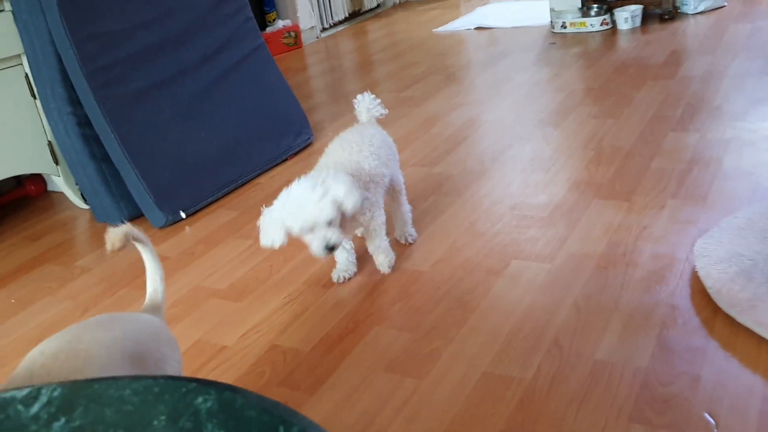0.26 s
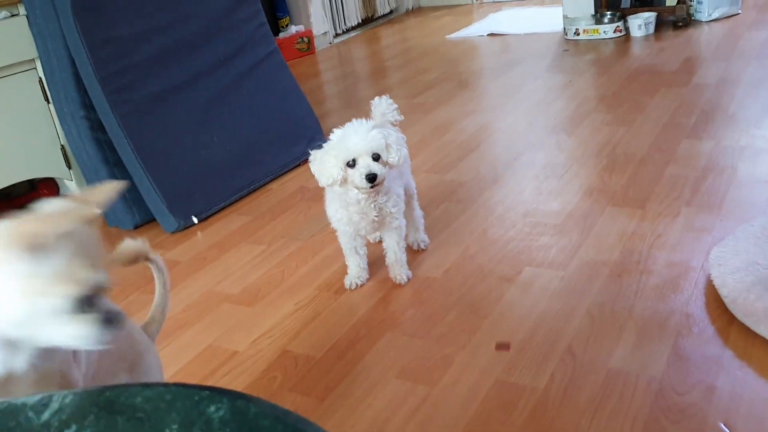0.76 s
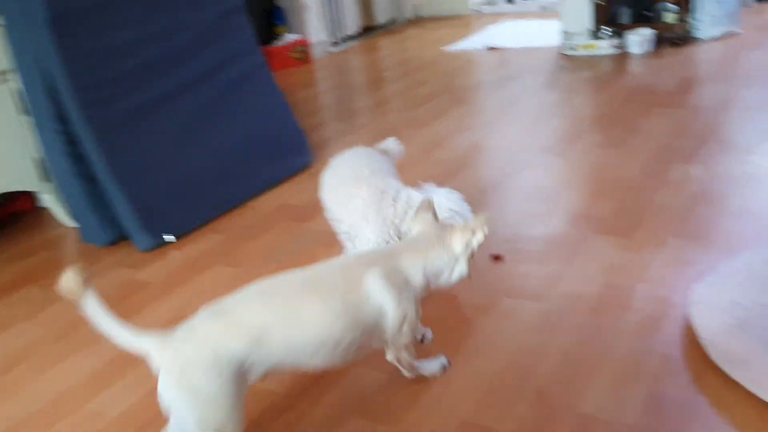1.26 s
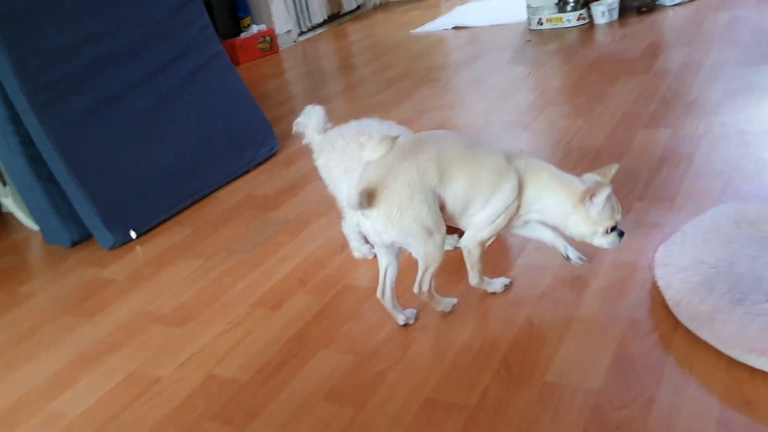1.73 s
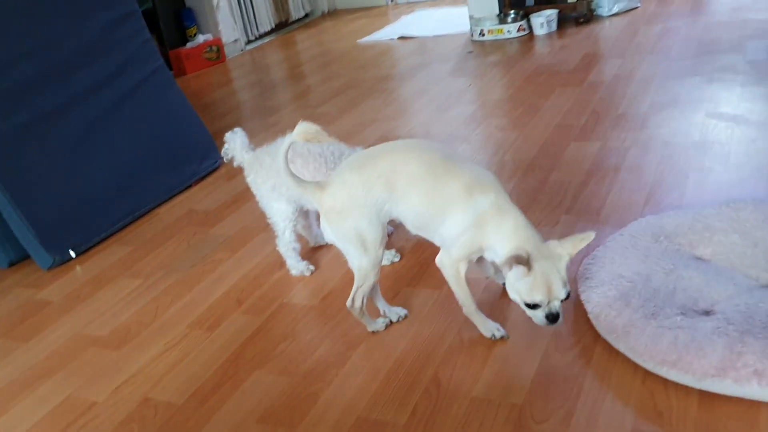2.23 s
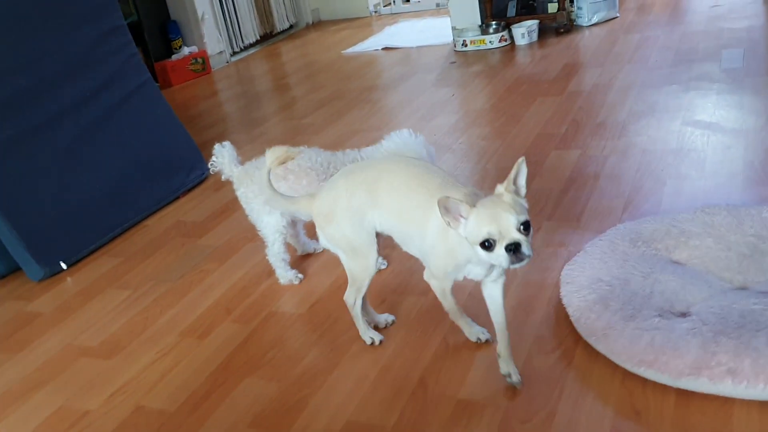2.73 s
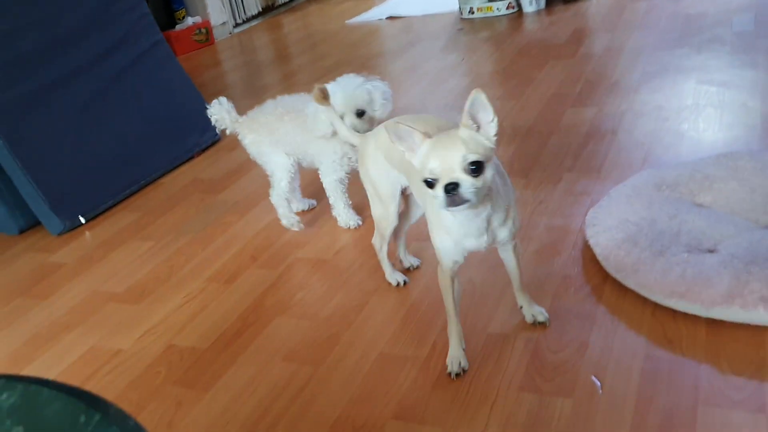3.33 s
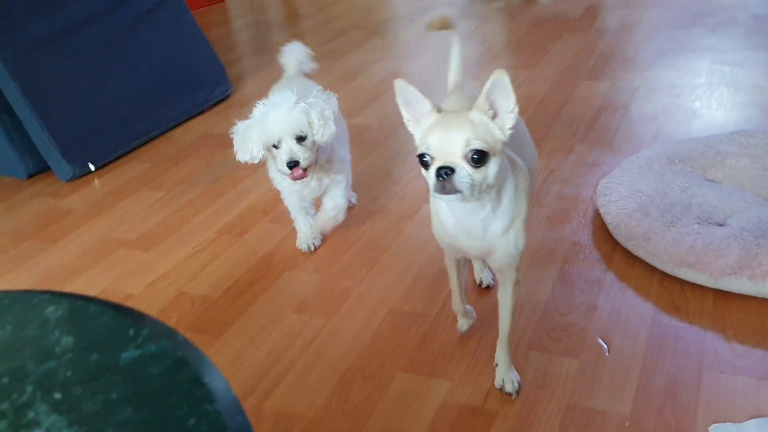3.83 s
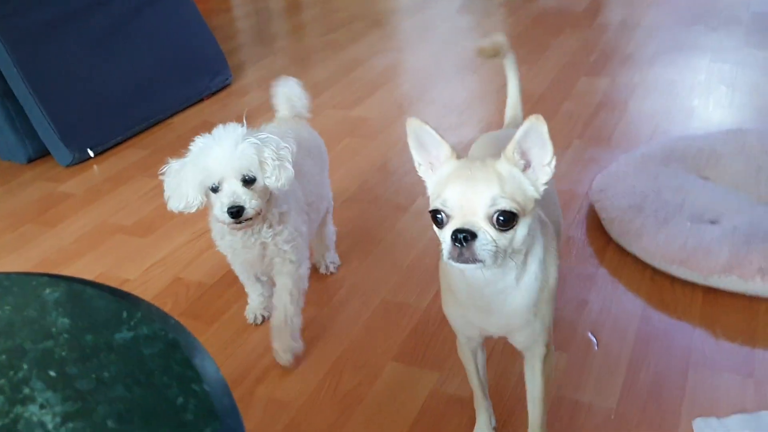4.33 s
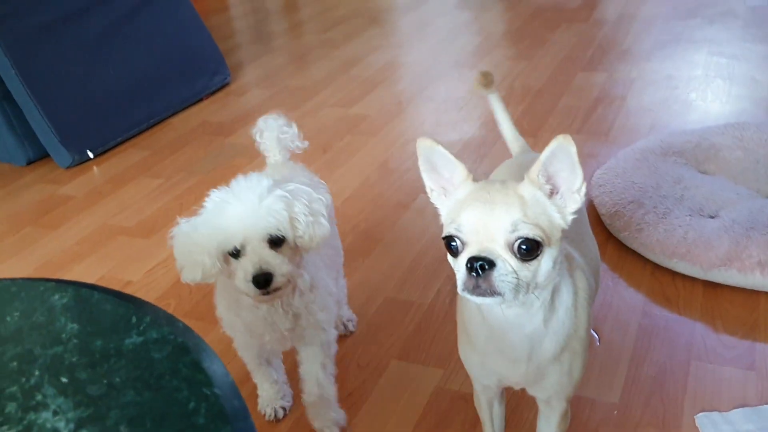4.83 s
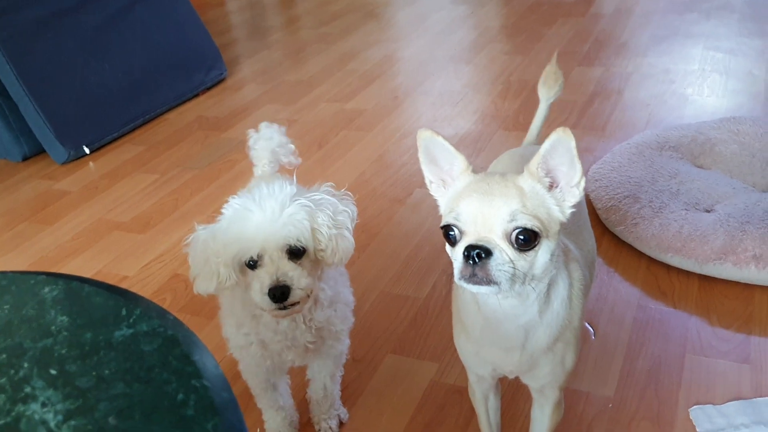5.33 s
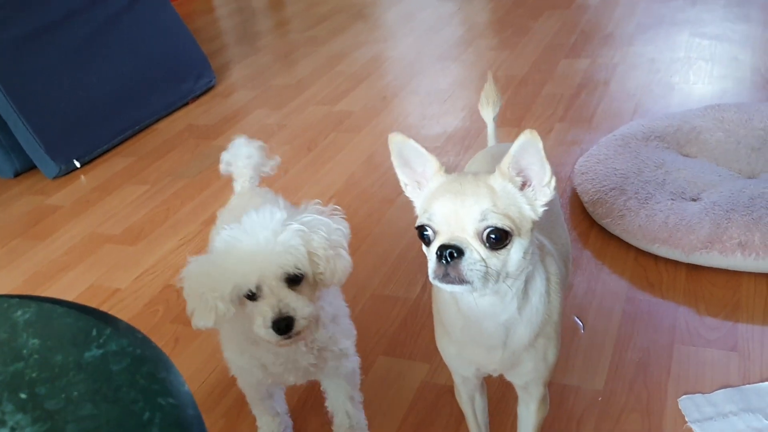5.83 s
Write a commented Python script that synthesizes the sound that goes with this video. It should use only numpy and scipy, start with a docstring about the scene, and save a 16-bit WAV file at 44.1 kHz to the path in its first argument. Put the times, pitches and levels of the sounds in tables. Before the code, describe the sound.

Small dogs' claws skitter across a hard living-room floor after a dropped treat, followed by brief crackly chewing of kibble, close by.

```python
"""Small dogs on a laminate floor in a living room, near a phone with two microphone ports.
A low rumble and faint hiss (shaped noise) run throughout; paw scuffs (tiny clicks) and faint sniffs come and go.
Bumps come early on; claws tick on the floor in front, and a treat lands: short rings, clicks and knocks that
ring on in the bare room. Later, close on the left, dry food is crunched: louder snaps over a dense crackle."""
import sys
import numpy as np
from scipy import signal
from scipy.fft import rfft, irfft, next_fast_len
from scipy.io import wavfile
from scipy.ndimage import uniform_filter1d

SR = 44100
rng = np.random.default_rng(int(sys.argv[2]) if len(sys.argv) > 2 else 0)


def output_pcm(signal):
    """Save a mono or channel-first signal as 16-bit PCM at the path in sys.argv[1].

    Samples are clipped to [-1, 1] before scaling.
    """
    pcm = np.clip(np.atleast_2d(signal).T, -1, 1) * 32767
    wavfile.write(sys.argv[1], SR, np.round(pcm).astype(np.int16))


N = 267687  # length in samples
SIZE = next_fast_len(N)  # a length that transforms quickly

# how alike left and right are at each pitch: pitch_hz [Hz], likeness [-1 to 1]
LIKENESS = [(60, 0.95), (180, 0.95), (550, 0.55), (1650, -0.3), (4970, 0.071), (15000, 0.076)]
# colour of a dry click: pitch_hz [Hz], relative_db [dB]
CLICK_COLOUR = [(900, -18.5), (1500, -2), (2500, 1.5), (3800, -1), (5000, -3.5), (6500, -24), (9000, -43.5)]
# colour of the fine treble in a click: pitch_hz [Hz], relative_db [dB]
TREBLE_COLOUR = [(3500, -33), (5500, 0.5), (7000, 2.5), (10000, -1.5), (13000, -6.5), (15000, -14.5),
                 (17000, -24)]


def gain_of(db):
    """Turns decibels into a plain multiplier."""
    return 10 ** (np.asarray(db) / 20)


def evened(x):
    """Scales a sound to an average strength (rms) of 1."""
    return x / np.sqrt(np.mean(x ** 2) + 1e-20)


def add(mix, at, sound):
    """Mixes a sound in from sample number at."""
    mix[..., at:at + sound.shape[-1]] += sound


def read(points, hz):
    """Reads a table between its points, with pitch on a log scale."""
    point_hz, value = np.transpose(points)
    return np.interp(np.log(hz + 1), np.log(point_hz + 1), value, value[0], value[-1])


def colour(x, points):
    """Filters with the given dB spectrum, never answering early; the filter's energy is 1."""
    log_gain = read(points, abs(np.fft.fftfreq(4096, 1 / SR))) * np.log(10) / 20
    # the Hilbert transform gives the phase that makes the filter answer at once
    taps = np.fft.ifft(np.exp(np.conj(signal.hilbert(log_gain)))).real[:2048]
    return signal.oaconvolve(x, taps / np.linalg.norm(taps))[:N]


def resonate(x, hz, width_hz):
    """Keeps a band around the curve hz: shifts it down to zero, smooths, and shifts back."""
    turn = np.exp(2j * np.pi * np.cumsum(hz) / SR)
    memory = np.exp(-np.pi * width_hz / SR)
    smooth = signal.lfilter([1 - memory], [1, -memory], x / turn)
    return 2 * (turn * smooth).real


def swells(rows):
    """Sums swells (peak_s, level_db, rise_s, fall_s), each straight in dB on both sides."""
    swell_db = 20  # change over one rise or fall time
    t = np.arange(0, N + 64, 64) / SR  # every 64th sample is enough
    gain = np.zeros(len(t))
    for peak_s, db, rise_s, fall_s in rows:
        distance = np.maximum((peak_s - t) / abs(rise_s), (t - peak_s) / abs(fall_s))
        gain += gain_of(db - swell_db * distance)
    return np.interp(np.arange(N) / SR, t, gain)


def partly_alike(left, other, hz):
    """Makes a right spectrum that shares with the left only what LIKENESS allows."""
    same = np.clip(read(LIKENESS, hz), -1, 1)
    same = same.reshape(-1, *[1] * (left.ndim - 1))
    return np.array([left, same * left + np.sqrt(1 - same ** 2) * other])


def wash(points):
    """Makes noise from all around at both ports, coloured by the table, rms 1."""
    hz = np.fft.rfftfreq(SIZE, 1 / SR)
    left, other = rfft(rng.standard_normal((2, SIZE)))
    spectrum = partly_alike(left, other, hz) * gain_of(read(points, hz))
    spectrum *= hz > points[0][0]  # nothing below the table's first pitch
    return evened(irfft(spectrum, SIZE)[:, :N])


def grains(per_s, spread_db, clump_db):
    """Scatters random clicks of uneven size whose strength comes in clumps, rms 1."""
    clumps = evened(uniform_filter1d(uniform_filter1d(rng.standard_normal(N), 500), 500))
    size = gain_of(spread_db * np.minimum(rng.exponential(1, N), 5) + clump_db * clumps)
    return evened(size * rng.choice([-1, 1], N) * (rng.random(N) < per_s / SR))


def splinters(gain):
    """Bits that crack: sparse short rings of 16 pitches, set off where the gain allows."""
    per_s, spread_db, clump_db = 503, 4.5, 3.7
    low_hz, high_hz, fade_cycles, level_db = 1196, 4998.5, 3, -1.5
    clicks = grains(per_s, spread_db, clump_db) * gain
    kind = rng.integers(0, 16, N)
    t = np.arange(600) / SR
    out = np.zeros(N)
    for k, hz in enumerate(np.geomspace(low_hz, high_hz, num=16)):
        ring = np.sin(2 * np.pi * hz * t) * np.exp(-t * hz / fade_cycles)
        out += signal.oaconvolve(clicks * (kind == k), ring / np.linalg.norm(ring))[:N]
    return gain_of(level_db) * out


def rustle(gain, pan_db):
    """Fine treble from many points at once: each port hears its own grains."""
    both = np.array([colour(grains(6600, 1.6, 2.5) * gain, TREBLE_COLOUR) for port in "LR"])
    return both * gain_of([[pan_db / 2], [-pan_db / 2]])


def hits(table, rise_cycles, click_db, knock_hz, knock_t60, bounce_s, first_db):
    """A light touch, then the blow: a brief ring, a dry click, treble and a low knock.
    Returns the direct sound and what the blow sends into the room."""
    t = np.arange(800) / SR
    parts = np.zeros((2, 3, N + len(t) * 2))  # (direct or room feed; ring, click or treble; time)
    for start_s, db, hz, treble_db, room_db, knock_db in table:
        u = t * hz / rise_cycles
        ring = np.sin(2 * np.pi * hz * t) * u * np.exp(1 - u)
        ring += gain_of(knock_db) * np.sin(2 * np.pi * knock_hz * t) * gain_of(-60 * t / knock_t60)
        chip_hz = rng.uniform(2450, 13500)  # each hit has its own glint
        chip = (t == 0) + .2 * np.sin(2 * np.pi * chip_hz * t) * gain_of(-60 * t / .0015)
        blow = gain_of(db) * np.array([ring, gain_of(click_db) * (t == 0), gain_of(treble_db) * chip])
        add(parts[0], round(start_s * SR), gain_of(first_db) * blow)
        add(parts, round((start_s + bounce_s) * SR), blow * gain_of([[[0]], [[room_db]]]))
    parts[1, 1] = np.roll(parts[1, 1], 130)  # the click reaches the room by a nearby surface
    return [ring[:N] + colour(click, CLICK_COLOUR) + colour(treble, TREBLE_COLOUR)
            for ring, click, treble in parts]


def placed(x, delay, side):
    """Places a sound: the right port hears it delay samples after the left; side scales the shading."""
    # the phone shades its far port: pitch_hz [Hz], shade_db [dB each way, at side 1]
    shade_rows = [(300, 0), (1000, 9.5), (3000, 2), (6000, 11), (12000, 19.5)]
    shade_db = side * read(shade_rows, np.fft.rfftfreq(SIZE, 1 / SR))
    ports = np.array([x, np.roll(x, delay)])
    return irfft(rfft(ports, SIZE) * gain_of([shade_db, -shade_db]), SIZE)[..., :N]


def room(x):
    """Sparse echoes of random sign; each pitch band dies at its own speed, by LIKENESS in both ports."""
    # ringing of the bare room: pitch_hz [Hz], t60_s [s to fall 60 dB, for the early part]
    ring_times = [(300, 0.25), (1300, 0.11), (3500, 0.14), (9000, 0.13), (15000, 0.16)]
    late_db, late_stretch = 0.5, 2.08  # far corners answer longer: (dB, factor on t60)
    slots = np.arange(60, SR // 2 - 20, 10)
    at = slots + rng.integers(0, 10, (2, len(slots)))
    echoes = np.zeros((2, SR // 2))
    sizes = rng.choice([-1., 1.], at.shape) * rng.uniform(0.22, 2.4, at.shape)
    np.put_along_axis(echoes, at, sizes, 1)
    echoes *= 1 - 0.61 * np.exp(-np.arange(SR // 2) / SR / 0.095)  # echoes build up at first
    hz, t, (left, other) = signal.stft(echoes, SR, nperseg=256)
    fall_db = -60 * t / read(ring_times, hz)[:, None]
    fall = gain_of(fall_db) + gain_of(late_db + fall_db / late_stretch)
    tail = signal.istft(partly_alike(left, other, hz) * fall, SR, nperseg=256)[1]
    return signal.fftconvolve(x[None], tail / np.linalg.norm(tail[0]), axes=1)[:, :N]


def rumble():
    """Low boom and drone of the building drift, with low swells from handling of the phone or weight on the boards."""
    # drift: time_s [s], boom_db [dB], drone_db [dB]
    drift_rows = [(0.0, -49, -52.5), (0.25, -55, -60), (0.93, -64.5, -57.5), (2.0, -55.5, -59.5),
                  (2.1, -50, -60), (3.04, -53.5, -63), (3.6, -58.5, -56), (4.72, -57, -55),
                  (5.0, -63.5, -61), (6.07, -57, -64)]
    # low swells, from handling of the phone or weight on the boards:
    # peak_s [s], boom_db [dB], drone_db [dB], fall_s [s]
    swell_rows = [(.18, -44, -44, 0.04), (1.08, -51.5, -62, .3), (3.849, -40, -45.5, 0.15),
                  (4.3, -46, -59, 0.078), (4.41, -64, -45.5, 0.13), (4.5, -55, -85, 0.24),
                  (5.21, -54.5, -83.5, .12), (5.29, -48.5, -47.5, 0.11), (5.68, -52.5, -63.5, 0.099)]
    # colours of the boom and of the drone: pitch_hz [Hz], relative_db [dB per Hz]
    boom_colour = [(28, -32), (42, 16.5), (57, 26.5), (75, 15.5), (100, -6.5), (130, -54)]
    drone_colour = [(90, 4), (150, -4.5), (200, -1), (225, 5), (250, -2.5), (290, -1), (340, -13),
                    (420, -44)]
    rise_s = 0.095
    out = np.zeros((2, N))
    time_s, *drift_db = np.transpose(drift_rows)
    for k, tone in enumerate([boom_colour, drone_colour]):
        drift = gain_of(np.interp(np.arange(N) / SR, time_s, drift_db[k]))
        low_swells = swells([(row[0], row[k + 1], rise_s, row[3]) for row in swell_rows])
        out += (drift + low_swells) * wash(tone)
    return out


def hiss():
    """A faint, steady hiss of shaped noise."""
    # colour of the hiss: pitch_hz [Hz], relative_db [dB per Hz]
    hiss_colour = [(190, -54), (330, -3.5), (408, -1), (530, -4), (948, -4), (1300, -9), (1730, -16.5),
                   (1910, -23), (3800, -32.5), (5500, -36.5), (9000, -75), (16000, -90)]
    return gain_of(-62) * wash(hiss_colour)


def sniffs():
    """Air in a small nose: noise through one resonance, swelling with each sniff."""
    # sniffs: peak_s [s], level_db [dB], rise_s [s], fall_s [s]
    sniff_rows = [(0.0, -61, .03, 0.05), (2.3, -86, .1, 0.17), (2.46, -87, .15, .1),
                  (5.612, -70, 0.046, 0.14)]
    nose_hz, width_hz = 3820, 150
    nose = resonate(rng.standard_normal(N), np.full(N, nose_hz), width_hz)
    return evened(nose) * swells(sniff_rows)


def scuff_gain(treble=False):
    """Loudness curve of the scuffs, or of their treble."""
    # paws sliding and fur brushing: time_s [s], level_db [dB], treble_db [dB, added to level_db]
    scuff_rows = [(0.0, -68, -10), (0.174, -70.5, -8.5), (0.45, -70.5, 1.5), (0.56, -99, -14),
                  (0.72, -99, -7), (0.75, -61, -0.5), (1.124, -59.5, -8), (1.306, -63, 1),
                  (1.88, -74, -5.5), (2.19, -70, -10.5), (2.24, -99, -17), (2.586, -79.5, -1.5),
                  (2.69, -93, -12), (2.8, -71.5, -2), (3.05, -81.5, -8), (3.14, -92, -6), (3.278, -67, -7),
                  (3.5, -74.5, -5.5), (3.8, -73, -8), (4.87, -73, -8), (5.1, -80.5, 0), (5.665, -99, -5),
                  (5.685, -67, 7.5), (5.95, -103.5, -1.5)]
    time_s, db, treble_db = np.transpose(scuff_rows)
    return gain_of(np.interp(np.arange(N) / SR, time_s, db + treble * treble_db))


def scuffs():
    """Paws sliding: many tiny slips of pad and claw, with a few that crack."""
    out = colour(grains(5000, 2.5, 5.8) * scuff_gain(), CLICK_COLOUR)
    out += colour(grains(5000, 2.6, 9.0) * scuff_gain(treble=True), TREBLE_COLOUR)
    return out + splinters(scuff_gain())


def bumps():
    """Bumps against the phone: low tones that start at once and die away."""
    # bumps: start_s [s], level_db [dB], pitch_hz [Hz], t60_s [s to fall 60 dB]
    bump_rows = [(.087, -44, 200, .03), (0.128, -38, 310, .03), (.139, -41.5, 720, 0.039),
                 (.166, -38, 900, .008), (.166, -23.5, 175, 0.028), (.182, -28, 139, .04)]
    t = np.arange(6000) / SR
    out = np.zeros(N)
    for start_s, db, hz, t60_s in bump_rows:
        add(out, round(start_s * SR), gain_of(db - 60 * t / t60_s) * np.sin(2 * np.pi * hz * t))
    return out


def claw_drags():
    """Single drags of a claw: a run of tiny slips through a resonance that glides in pitch."""
    # drags: start_s [s], length_s [s], level_db [dB, before the fade], start_hz [Hz], end_hz [Hz]
    drag_rows = [(0.11, 0.066, -57, 4070, 3100), (0.239, 0.038, -60.5, 3500, 2520),
                 (1.192, 0.041, -49.5, 2640, 2350), (1.258, 0.041, -58, 1490, 1700),
                 (1.293, 0.039, -42.5, 3300, 4370), (1.356, 0.052, -45, 2520, 3200),
                 (1.43, 0.041, -45.5, 3000, 3370), (1.548, 0.034, -49.5, 3640, 4250),
                 (2.59, 0.18, -77, 4330, 4800), (5.109, 0.16, -59, 1780, 2510),
                 (5.69, 0.065, -81, 6200, 6000)]
    slips = grains(2400, 1.6, 2.8)
    out = np.zeros(N)
    for start_s, length_s, db, start_hz, end_hz in drag_rows:
        at, n = round(start_s * SR), round(length_s * SR)
        drag = resonate(slips[at:at + n], np.linspace(start_hz, end_hz, n), width_hz=960.0)
        add(out, at, gain_of(db) * evened(drag) * np.hanning(n))  # fades in and out
    return out


def floor_ticks():
    """Claws and the skidding treat tick on the floor, each with a knock of the board under it."""
    # ticks: start_s [s], level_db [dB], ring_hz [Hz], treble_db [dB], room_db [dB]
    tick_rows = [(0.1172, -53.5, 3300, 13.5, 15), (0.2435, -56, 3680, -6.5, -3),
                 (0.2649, -45, 3400, -13, 6.5), (0.387, -45.5, 1500, 5.5, 2), (0.4308, -49, 2740, 10, 2.5),
                 (0.732, -39.5, 2400, -6, 0), (0.7368, -35, 3100, -13, 3), (0.7512, -32, 3000, -15, 4),
                 (0.8942, -42, 4100, -7.5, 4), (0.9447, -26, 3350, 4, 5), (1.0405, -59, 3000, 32, 5.5),
                 (1.0576, -19.5, 2800, 4, 3.5), (1.1171, -30, 4800, 7.5, 9), (1.1645, -29, 3580, 5, 4),
                 (1.263, -38, 1480, 3, 1), (1.2811, -35, 3680, 11.5, 8), (1.2842, -29.5, 4250, 16, -21),
                 (1.3143, -38.5, 4160, 1, 12), (1.4421, -47.5, 3220, 19, 8.5), (1.49, -27, 1640, 5.5, 4),
                 (1.6735, -34.5, 3580, 0.5, 7.5), (1.688, -34, 4470, -10, -2.5),
                 (1.8023, -42.5, 1950, 4, 9.5), (1.9892, -48, 1970, 2.5, 9), (2.102, -40, 2480, 3.5, 8.5),
                 (2.1228, -43, 2340, -5.5, -11), (2.7292, -50.5, 4500, 0.5, 9.5),
                 (2.7935, -40.5, 2180, 0.5, 4), (2.9017, -51, 2520, 4.5, 12.5), (3.2225, -54, 2600, -2, 15),
                 (3.2821, -39.5, 2640, 10, 1), (3.3829, -46.5, 4660, 9.5, 2), (3.4519, -46, 3340, -3, 9.5),
                 (3.498, -42, 2860, 4, 4.5), (3.5386, -41.5, 3900, 0.5, 9), (3.5873, -45.5, 3060, -2, 5),
                 (3.6892, -43.5, 2980, 4, 10), (4.7261, -34.5, 2660, 4, 3.5), (4.8756, -42, 1490, 6, 0),
                 (4.9103, -48, 3100, 9, -26), (4.9495, -43, 3870, 4, 1.5), (5.0674, -60, 1400, 18.5, -8),
                 (5.675, -63.5, 3680, -8, 22.5), (5.829, -41.5, 3380, 16.5, -2),
                 (5.8407, -42, 2780, -24, 4)]
    board_db = -15.5  # against the ring
    return hits([(*row, board_db) for row in tick_rows], rise_cycles=0.56, click_db=8.3, knock_hz=800,
                knock_t60=0.0019, bounce_s=0.001203, first_db=-13.5)


def treat():
    """One end touches, then the piece slaps flat. Returns direct sound and room feed."""
    # colour of the landing: pitch_hz [Hz], relative_db [dB]
    treat_colour = [(300, -26), (700, -9.5), (1100, -3), (1500, 5), (2200, 5.5), (3200, -0.5),
                    (4200, -10.5), (5900, -24), (12300, -28.5), (16000, -62)]
    land_s, slap_db, room_db = 0.7199, -2.5, 5.75  # levels before colouring
    touch, slap = np.zeros((2, N))
    at = round(land_s * SR)
    touch[at] = gain_of(slap_db - 7)
    slap[at + 53] = gain_of(slap_db)  # 53 samples later
    return colour(touch + slap, treat_colour), gain_of(room_db) * colour(slap, treat_colour)


def food_snaps():
    """Dry food snaps between teeth, each snap with a knock of the jaw."""
    # snaps: start_s [s], level_db [dB], ring_hz [Hz], treble_db [dB], room_db [dB], knock_db [dB]
    snap_rows = [(3.7323, -49.5, 3360, 9.5, 11, 3), (3.8242, -35, 2640, -23, 16, -2),
                 (3.8691, -35.5, 2580, 4, -9, -22), (3.8901, -25, 2560, 6.5, 8.5, -16),
                 (3.9465, -20.5, 3630, 1.5, -10, -8), (4.0921, -27.5, 3100, -7, 6.5, -7.5),
                 (4.1676, -35, 1510, -16, 2, -5), (4.2278, -23, 4160, 4.5, -10.5, 5.5),
                 (4.2372, -41, 4400, -10.5, -7, 15), (4.2968, -31, 3470, 11.5, -3, 1),
                 (4.369, -23.5, 1400, -21, 5, -2), (4.3869, -22.5, 3320, -16, -18, -3),
                 (4.3935, -28, 3600, -2.5, -5, -19), (4.4034, -18, 1560, -18, 1.5, -14.5),
                 (4.4065, -19.5, 2200, -15, -1, -21), (4.5447, -22, 1540, -20, -5, -14),
                 (4.5694, -24, 1520, -0.5, -23, -8), (4.629, -39.5, 2330, -9, 10.5, -28),
                 (4.6463, -37, 3130, -7, -6, -22), (4.6857, -32, 2000, -5, 5.5, -4.5),
                 (4.7456, -29, 2010, -13, -15, -21), (5.2181, -30.5, 1550, -8, 0.5, -7),
                 (5.2714, -30, 2800, -17, 7, -10.5)]
    return hits(snap_rows, rise_cycles=0.61, click_db=4.9, knock_hz=857,
                knock_t60=0.0073, bounce_s=0.001097, first_db=-5.5)


def chewing(part):
    """Loudness as each closing of the jaw grinds: part 0 the crackle, 1 its treble, 2 its body."""
    # closings: peak_s [s], level_db [dB], rise_s [s], fall_s [s],
    # treble_db and body_db [dB, added to level_db]
    jaw_rows = [(3.824, -56.5, 0.011, 0.37, -28, 6), (3.9, -42, 0.11, 0.065, -10, -4.5),
                (3.947, -41, 0.065, .14, -13.5, -5.5), (4.089, -50.5, 0.014, 0.2, -7.5, -1.5),
                (4.227, -41, 0.016, 0.12, -7, 2.5), (4.404, -29, 0.028, 0.05, -11.5, -1),
                (4.545, -40, 0.014, 0.084, -15, -12), (4.74, -62, 0.55, 0.039, -5.5, 5.5),
                (5.22, -57.5, 0.15, 0.12, -8, 8), (5.273, -39.5, 0.017, 0.036, -19.5, -5)]
    return swells([(peak_s, db + [0, *part_db][part], rise_s, fall_s)
                   for peak_s, db, rise_s, fall_s, *part_db in jaw_rows])


def grind():
    """Crumbs break in a dense crackle that sounds through teeth, mouth and jaw."""
    # colour of mouth and jaw: pitch_hz [Hz], relative_db [dB]
    body_colour = [(150, -31.5), (300, -12), (450, 6), (780, 3.5), (1200, 12), (1700, 8.5), (2500, -83)]
    out = splinters(chewing(0))
    layers = (CLICK_COLOUR, 2200, 4.), (TREBLE_COLOUR, 3500, 3.8), (body_colour, 1500, 3.5)
    for part, (tone, per_s, spread_db) in enumerate(layers):
        out += colour(grains(per_s, spread_db, clump_db=3.5) * chewing(part), tone)
    return out


def scene():
    """Floor sounds in front, chewing on the left, each with its echo, over the background."""
    background = rumble() + hiss() + bumps()
    scuff = sniffs() + scuffs() + claw_drags()
    tick, tick_feed = floor_ticks()
    toss, toss_feed = treat()
    snap, snap_feed = food_snaps()
    crumbs = grind()
    front = placed(tick + toss + scuff, delay=-2, side=0.2)
    left = placed(snap + crumbs, delay=14, side=0.35)
    front += rustle(scuff_gain(treble=True), pan_db=.6)
    left += rustle(gain_of(-5.0) * chewing(1), pan_db=2.5)
    front_echo = room(tick_feed + toss_feed + gain_of(2.0) * scuff)
    left_echo = room(snap_feed + gain_of(-2.5) * crumbs) * gain_of([[.6], [-.6]])  # leans left
    return front + left + front_echo + left_echo + background


def record(dry):
    """Cuts off the very top of the treble."""
    low_pass = signal.firwin(255, 16300, window=("kaiser", 9), fs=SR)  # cutoff in Hz
    return signal.oaconvolve(dry, low_pass[None], "same")


dry = scene()
out = record(dry)
output_pcm(out)
```